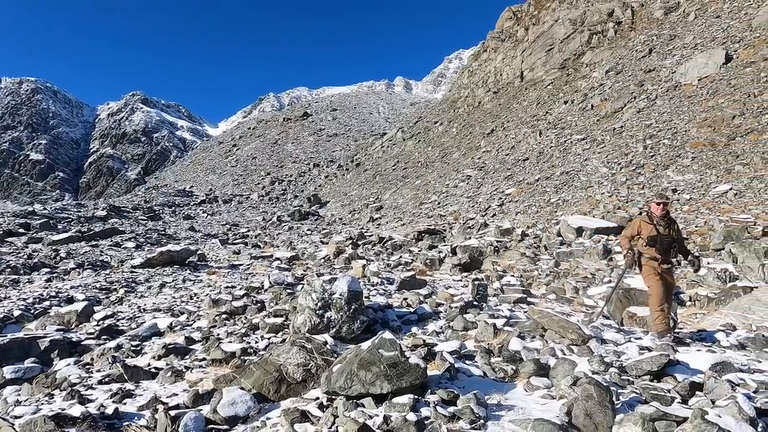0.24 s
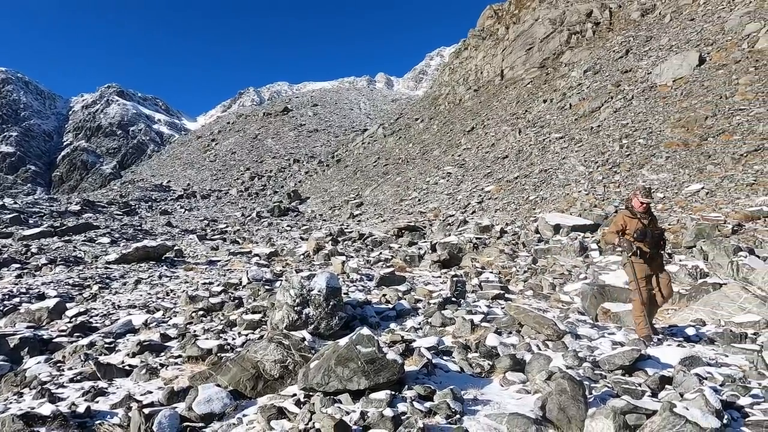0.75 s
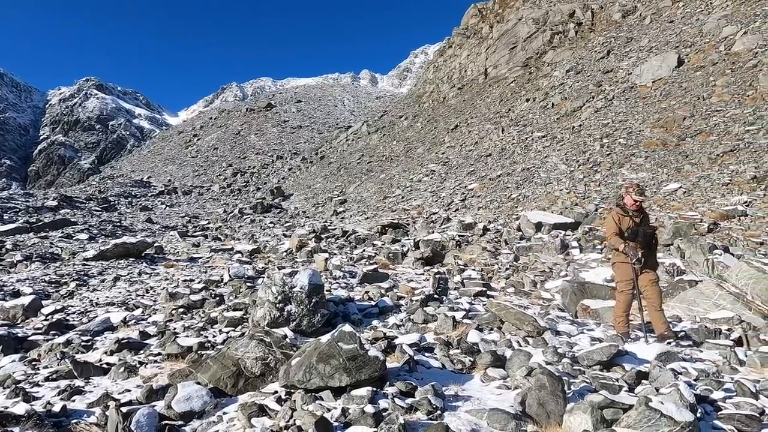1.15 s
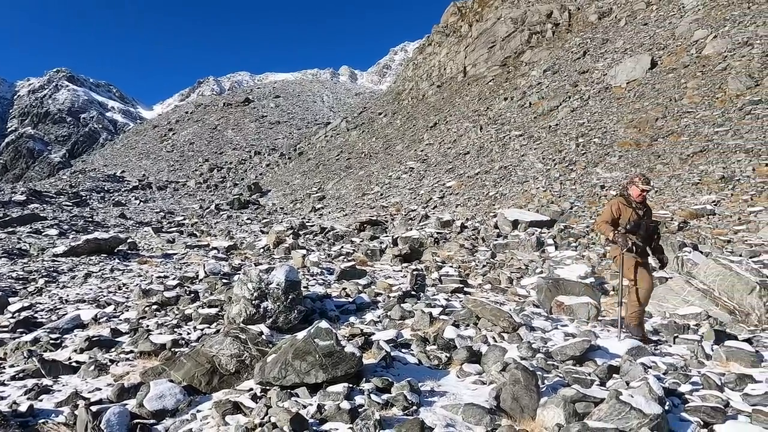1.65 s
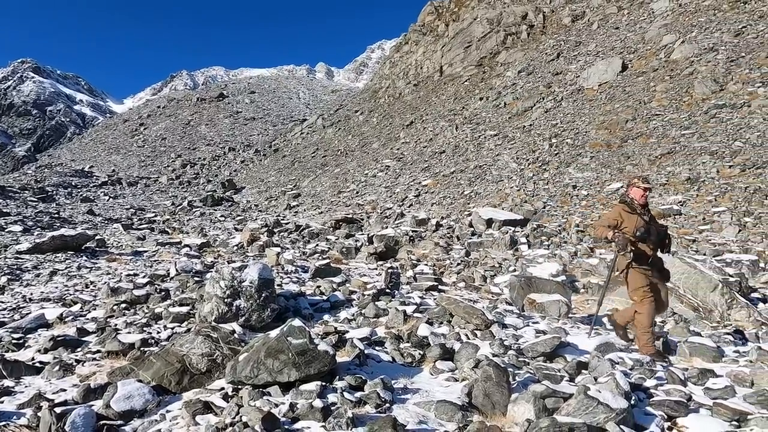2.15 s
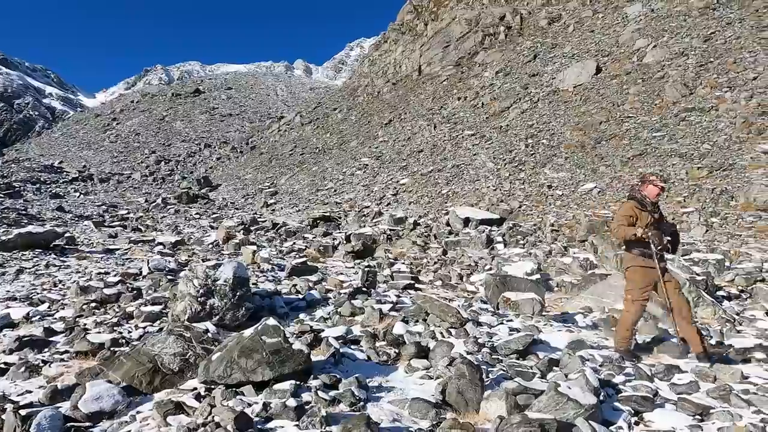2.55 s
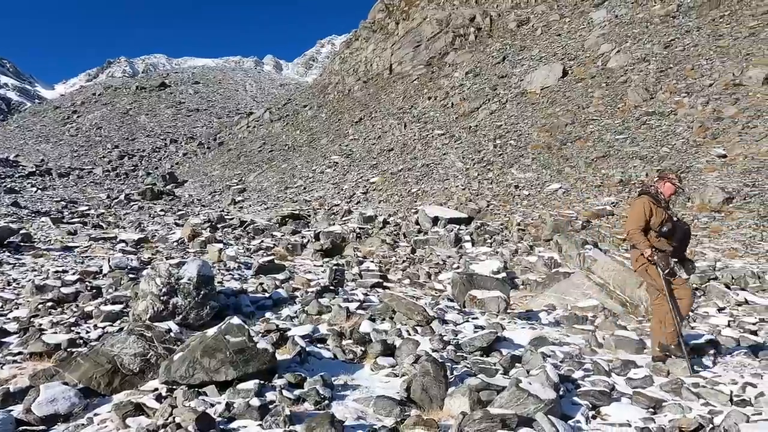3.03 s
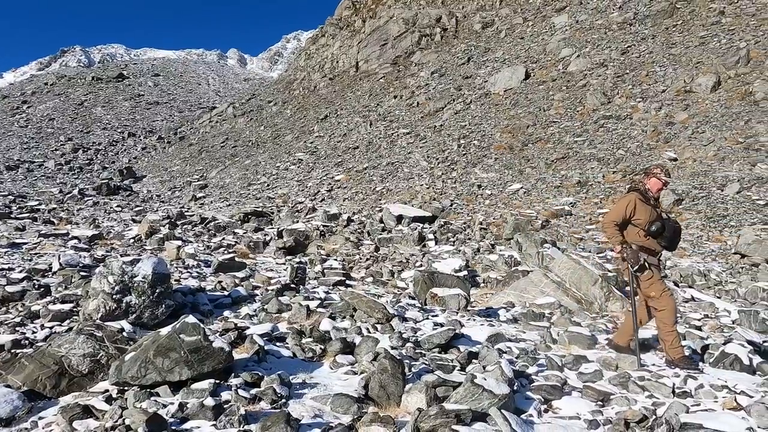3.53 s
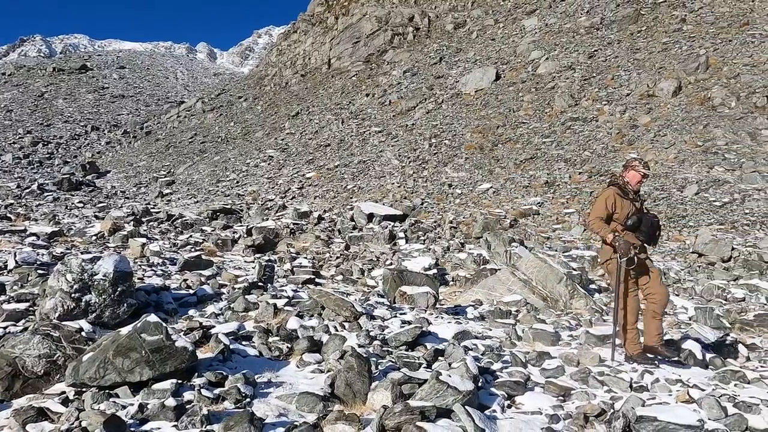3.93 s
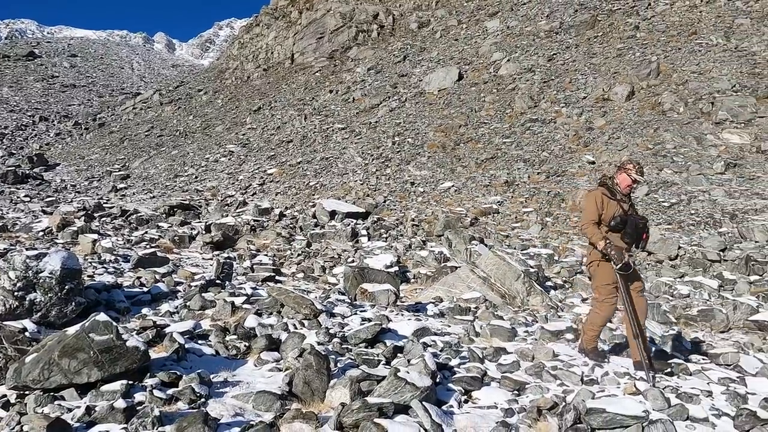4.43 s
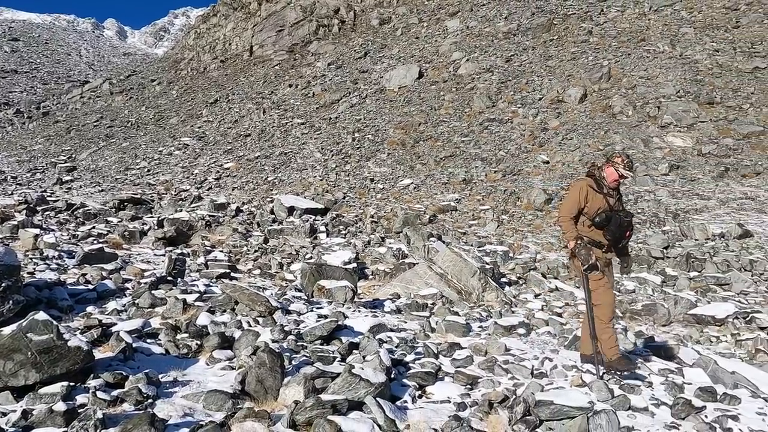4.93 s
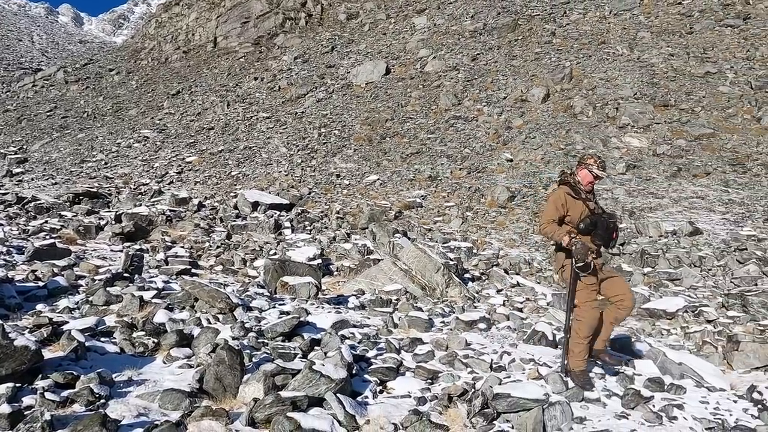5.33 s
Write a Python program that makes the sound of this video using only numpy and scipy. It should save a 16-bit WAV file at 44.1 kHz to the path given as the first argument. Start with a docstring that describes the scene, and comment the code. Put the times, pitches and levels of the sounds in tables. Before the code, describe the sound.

Sparse, dry rock clacks and short gritty scrapes from a walker on scree, with deep wind rumble strongest at the start.

```python
"""A walker with a pole crosses loose scree on an open mountainside, some metres from the microphone.
Stones tip under boots and pole, knock and grind: each contact is a crack of grit plus a few short modes,
and the rubble around scatters it as sparse echoes.
Wind buffets the microphone as shaped noise in three bands, over the smooth noise of a distant valley rush,
whose hiss eases slightly, then grows as the microphone turns towards it."""
import sys
import numpy as np
from scipy import signal
from scipy.fft import rfft, irfft
from scipy.io import wavfile
from scipy.ndimage import uniform_filter1d

SR = 44100
rng = np.random.default_rng(int(sys.argv[2]) if len(sys.argv) > 2 else 0)


def to_wav(s):
    """Save 16-bit WAV."""
    ch = np.atleast_2d(s).T  # columns
    pcm = np.round(np.clip(ch, -1, 1) * 32767)  # PCM
    wavfile.write(sys.argv[1], SR, pcm.astype(np.int16))


N = 246078

# strength of the wind at the microphone, about its mean: (t/s, large eddies level/dB, small eddies level/dB)
WIND_STRENGTH = [(0, 11, 2), (0.11, 13, 1), (0.4, 10.5, 3.5), (0.49, 4.2, -0.5), (0.78, 8.5, 7.5),
                 (0.93, 1.1, 1), (1.01, 6.5, 3), (1.55, -6.5, -6), (1.84, -12, -5), (2.01, 4, -5),
                 (2.23, -8.5, -6), (2.5, 3.5, 2), (2.9, 3.5, 2), (3.06, 0.5, 0.5), (3.25, -1, 5),
                 (3.52, -4.8, -3.1), (4.1, 6.5, 0), (4.26, -8, 1.5), (4.48, 9, 2), (4.74, -6.2, -1.0),
                 (5.58, -7.5, -0.5)]


def amp(db):
    """Amplitude factor of a level in dB."""
    return 10 ** (np.asarray(db) / 20)


def unit(x):
    """Scales to rms 1."""
    return x / np.sqrt(np.mean(x ** 2) + 1e-20)


def read(points, hz, roll_off_db=24):
    """A spectrum in dB, straight over log frequency; above its last point it falls by roll_off_db per octave."""
    f, db = np.transpose(points)
    octaves_above = np.log2(np.maximum(hz / f[-1], 1))
    level_db = np.interp(np.log(hz + 1e-3), np.log(f), db)
    return level_db - roll_off_db * octaves_above


def add(mix, s, sound):
    """Mixes a sound in at time s, cut where the mix ends."""
    part = mix[round(s * SR):][:len(sound)]
    part += sound[:len(part)]


def along(curve):
    """Each column of a curve, with a value for every sample."""
    s, *columns = np.transpose(curve)
    t = np.arange(N) / SR
    return [np.interp(t, s, column) for column in columns]


def noise(spectrum):
    """Steady noise of rms 1 with the given spectrum."""
    hz = np.fft.rfftfreq(N, 1 / SR)
    white = rfft(rng.standard_normal(N))
    return unit(irfft(white * amp(read(spectrum, hz)), N))


def blown(eddy_db, level_db, follow):
    """The gain of a layer that rises and falls with the wind."""
    return amp(level_db + follow * eddy_db)


def valley():
    """The smooth distant rush, barely stirred by the gusts, and the hiss heard when the microphone faces it."""
    # spectrum of the distant rush, relative: (f/Hz, level/dB per Hz)
    rush_spectrum = [(60, 2.5), (150, 0), (290, -2.5), (375, 2), (520, -0.5), (750, -2.5), (1200, -5.5),
                     (2200, -10.5), (3500, -15.5), (5500, -17), (8000, -23.5), (11500, -26), (15500, -35)]
    # spectrum of its hiss, relative: (f/Hz, level/dB per Hz)
    hiss_spectrum = [(600, 1.5), (2500, 3.5), (6500, -1), (9000, -4), (12000, -6.5), (15500, -18)]
    # the hiss as the microphone turns: (t/s, level/dB)
    facing = [(0, -68), (2.7, -70.5), (3.8, -64), (5.4, -58.5)]
    # how the rush follows the large eddies: (level in mean wind/dB, follow/dB per dB of wind)
    rush_law = (-53, 0.045)
    large_db, _ = along(WIND_STRENGTH)
    hiss_db, = along(facing)
    rush = blown(large_db, *rush_law) * noise(rush_spectrum)
    return rush + amp(hiss_db) * noise(hiss_spectrum)


def eddies(spectrum, size):
    """Turbulent pressure evened out over size samples, so that the gusts alone set its level."""
    x = noise(spectrum)
    return x / np.sqrt(uniform_filter1d(x ** 2, size) + 1e-3)


def wind():
    """Large eddies sway the diaphragm slowly and rumble; small ones flutter."""
    # spectra of the pressure on the microphone, relative: (f/Hz, level/dB per Hz)
    sway_spectrum = [(1, -14), (3, -5.5), (6, -0.5), (10, -3.5), (18, -21.5), (30, -39), (60, -82)]
    buffet_spectrum = [(10, -2.5), (20, -19), (30, -1), (42, -13.5), (60, -26.5), (90, -37.5), (140, -48),
                       (400, -85.5)]
    flutter_spectrum = [(30, -4), (55, 1), (80, 0), (120, -10), (180, -13), (300, -20), (800, -43),
                        (2000, -72)]
    # how each layer follows its eddies: (level in mean wind/dB, follow/dB per dB of wind)
    sway_law = (-23, 0.63)
    buffet_law = (-40, 0.99)
    flutter_law = (-57, 1.25)
    large_db, small_db = along(WIND_STRENGTH)
    sway = blown(large_db, *sway_law) * eddies(sway_spectrum, size=12000)
    rumble = blown(large_db, *buffet_law) * eddies(buffet_spectrum, size=4000)
    flutter = blown(small_db, *flutter_law) * eddies(flutter_spectrum, size=4000)
    return sway + rumble + flutter


def contact(tilt_db, size=1024):
    """The causal pulse of one contact, energy 1; harder points are brighter."""
    # spectrum of the crack, relative: (f/Hz, level/dB per Hz)
    crack_spectrum = [(120, -28), (350, -1), (800, -5.5), (1500, 2), (3800, -1.5), (5500, -4.5), (8400, -9),
                      (10000, -14), (15500, -25.5)]
    hz = abs(np.fft.fftfreq(size, 1 / SR))
    # the tilt nears tilt_db per octave well above 1 kHz
    gain_db = read(crack_spectrum, hz) + tilt_db * np.log2(1 + hz / 1000)
    # minimum phase puts the energy at the start
    log_response = np.conj(signal.hilbert(np.log(amp(gain_db))))
    pulse = np.fft.ifft(np.exp(log_response)).real
    return pulse / np.linalg.norm(pulse)


def ring(body, size=4096):
    """The short-lived modes of a struck body; neighbouring modes start in opposite directions."""
    # modes of the pole and of each stone: name: (f/Hz, relative level/dB, t60/s)
    bodies = { "pole": [(1310, 0.5, 0.02), (1620, 2, 0.034), (2000, -5, 0.0167), (2490, -1, 0.023),
              (3350, 0.5, 0.018), (5540, -2.5, .035), (8270, -5.5, 0.036), (13475, -17, .045)],
              "slab": [(973, -2, 0.031), (1362, 2, 0.0259), (2020, -5, 0.026), (2530, -4, 0.0147),
              (3460, -3, 0.012), (4150, -3.5, 0.012), (5810, -12, 0.016), (6900, -15, .012)],
              "plate": [(1550, 1, 0.031), (2200, -1, 0.023), (2640, 3.5, 0.0196), (3240, 2, 0.022),
              (3700, 3, .022), (3900, -3, 0.019), (5200, -1, 0.028), (5760, 1, 0.0183), (6460, -7, .018),
              (6970, -11, .025)], "flake": [(1532, -2, 0.0245), (2380, -2, .02), (3280, 2, .02),
              (3680, 1, 0.023), (4230, 3, 0.016), (4770, -1, 0.023), (5310, 3, .026), (8100, -4, .018),
              (8670, -9, 0.032)], "lump": [(1300, 3.5, 0.019), (1586, 0, 0.017), (2090, -1, 0.013),
              (2545, -0.5, 0.027), (3345, -6, 0.017), (4000, -6, 0.0177), (5200, -20.5, .014),
              (8936, -10, 0.026), (11514, -9, .012)], "shard": [(1700, -11, .02), (2508, -9, .018),
              (2880, 0, .028), (3500, -6, .022), (4000, -9, .014), (5800, -13, .014), (7700, -10, .022)],
              "cobble": [(421, -5, 0.027), (913, 1, 0.025), (1674, -3.5, 0.0197), (2580, -4, 0.021),
              (3413, 0.5, 0.031), (3870, -4, .018), (5246, -8, 0.027), (5640, -4.5, 0.018),
              (6300, -8, 0.016), (7930, -9, 0.0213), (8360, -10, 0.025)], "boulder": [(990, -8, 0.023),
              (1160, -3, 0.019), (1615, 1, .022), (1840, -0.5, 0.021), (2130, -0.5, 0.0147),
              (2680, -3, 0.0105), (3100, -10, 0.015), (3870, -3, .018), (6100, -6, 0.0159),
              (8100, -12, .016)], "ledge": [(1234, 1.5, 0.041), (1620, -1, 0.018), (2430, -8, .016),
              (3280, -4, 0.023), (5240, -10, 0.018), (7700, -3, 0.018), (8300, -3, .02), (8800, -4, 0.022)],
              "block": [(550, -5, .02), (748, -5, .022), (940, -5, .024), (1590, -2, .028),
              (2300, -7, .016), (3450, -5, .026), (3725, -1, .02), (3950, -6, .016), (5447, -10, .05),
              (5800, -8, .014), (6303, -8, .022), (7493, -9, .02), (9846, -14, .018)],
              "chip": [(1610, -2, .025), (3070, -4, .018), (3437, 2.5, .025), (3800, 4.5, .012),
              (4210, 3, .012), (5430, -1, 0.0254), (6680, -4, .018), (14300, -9, .012)], }
    t = np.arange(size) / SR
    modes = np.zeros(size)
    for k, (hz, db, t60) in enumerate(bodies[body]):
        modes += (-1) ** k * amp(db - 60 * t / t60) * np.sin(2 * np.pi * hz * t)
    return modes


def knock(body, ring_db, crack_db, tilt_db, t60, first_blow=1.6, grit_share=.3, size=4096):
    """One hard contact, a dying chatter of crushed grit, and the ring of the body."""
    fade = amp(-60 * np.arange(size) / SR / t60)
    grit = rng.standard_normal(size) * (rng.random(size) < grit_share)
    chatter = fade * unit(grit)
    chatter[0] = first_blow
    crack = signal.fftconvolve(chatter, contact(tilt_db))[:size]
    # the crack carries the energy of its fade, however bright it is
    crack *= np.linalg.norm(fade) / np.linalg.norm(crack)
    return amp(crack_db) * crack + amp(ring_db) * ring(body)


def rebounds(s, gap_s, count):
    """The first blow and each rebound, weaker and sooner each time, as (s, dB against the first)."""
    rebound_db, gap_share = -4, .88  # dB per rebound, share of the gap before
    k = np.arange(round(count) + 1)
    gaps = gap_s * gap_share ** k
    return zip(s + np.cumsum(gaps) - gaps, k * rebound_db)


def grind(start, end, body, from_db, to_db, tilt_db, slips_per_s=5000, ring_share=0.79):
    """Tiny irregular slips, each a small contact that keeps the sliding stone ringing."""
    count = max(round((end - start) * SR), 2)
    slips = rng.standard_normal(count) * (rng.random(count) < slips_per_s / SR)
    slips = unit(slips) * amp(np.linspace(from_db, to_db, count))
    modes = ring(body)
    one_slip = ring_share * modes / np.linalg.norm(modes)  # ring_share is against a contact of norm 1
    add(one_slip, 0, contact(tilt_db))
    return signal.fftconvolve(slips, one_slip / np.linalg.norm(one_slip))


def rubble(x, size=16384):
    """Sparse echoes off the rocks nearby, and a faint scatter from the slope; snow dulls both."""
    near_db, near_t60 = -11, 0.0646  # dB before dulling, s
    far_db, far_t60 = -26, 0.24  # dB before dulling, s
    echoes_per_s, dull_hz = 2500, 4000
    t = np.arange(size) / SR
    echoes = np.zeros(size)
    for db, t60 in ((near_db, near_t60), (far_db, far_t60)):
        signs = rng.choice([-1, 1], size)
        sparse = rng.random(size) < echoes_per_s / SR
        taps = signs * sparse * (t > .001) * amp(-60 * t / t60)
        echoes += amp(db) * taps / np.linalg.norm(taps)
    echoes = signal.lfilter(*signal.butter(1, dull_hz, fs=SR), echoes)
    return x + signal.fftconvolve(x, echoes)[:N]


def footsteps():
    """All knocks, rebounds and slides under the boots and the pole, scattered by the rubble."""
    # pole or stone on stone: (t/s, body, ring level/dB, crack level/dB, crack tilt/dB per octave,
    # crack t60/s, rebounds/count to be rounded, time to the first rebound/s)
    knocks = [ (1.2586, "slab", -23.5, -34.5, -1.8, .043, 0, 0), (1.2668, "pole", -38, -38, -1, .03, 0, 0),
              (1.2715, "pole", -37, -39.5, 2, .03, 0, 0), (1.3529, "plate", -35.5, -32.5, -.8, .027, 0, 0),
              (1.3728, "plate", -51, -47, 0, .02, 0, 0), (2.8915, "flake", -44, -39, -4, 0.0306, 0, 0),
              (2.8939, "flake", -42.5, -38, 0, .03, 1, .0041), (2.9223, "lump", -38.5, -44, -3, .025, 0, 0),
              (2.929, "lump", -38.5, -34, 1.8, 0.035, 3, .0078),
              (2.9775, "shard", -34.5, -36.5, 4, 0.015, 0, 0),
              (3.4090, "cobble", -33, -35.5, 0.3, 0.044, 0, 0), (3.7380, "chip", -62, -51.5, 8, .039, 0, 0),
              (4.0099, "chip", -44, -50, 15, .019, 0, 0),
              (4.5783, "boulder", -31, -33.5, -2, 0.018, 1, .0046),
              (4.58, "ledge", -36.5, -36, 2, .02, 0, 0),
              (4.5925, "pole", -41.5, -36, 2, 0.017, 1.5, 0.0089),
              (4.6276, "block", -29, -30.5, -1, 0.041, 0, 0), (4.7117, "shard", -41, -45, -0.5, .02, 0, 0),
              ]
    # a stone sliding under load: (start t/s, end t/s, body, start level/dB, end level/dB,
    # grit tilt/dB per octave)
    grinds = [ (1.273, 1.305, "plate", -47, -55, -0.5), (1.306, 1.35, "plate", -47.5, -44.5, -2.5),
              (1.363, 1.38, "plate", -49, -62, 3), (2.903, 2.926, "flake", -56, -52, -3),
              (2.938, 2.964, "lump", -37.5, -55, 3.5), (3.396, 3.412, "flake", -49, -47, 2.5),
              (3.422, 3.442, "cobble", -60, -57, 1), (4.583, 4.623, "ledge", -39.5, -51, 1),
              (4.638, 4.67, "block", -55, -57, -2), ]
    mix = np.zeros(N)
    for start, body, ring_db, crack_db, tilt_db, t60, count, gap_s in knocks:
        for s, drop_db in rebounds(start, gap_s, count=count):
            add(mix, s, knock(body, ring_db + drop_db, crack_db + drop_db, tilt_db, t60))
    for row in grinds:
        add(mix, row[0], grind(*row))
    return rubble(mix)


def scene():
    """Valley, wind and footsteps at one microphone."""
    return (valley() + wind() + footsteps())[None]


def record(dry):
    """Low-pass: nothing is heard above about 15.8 kHz."""
    edge_hz = 15800
    low_pass = signal.firwin(511, edge_hz, window=("kaiser", 9), fs=SR)
    padded = np.pad(dry, ((0, 0), (len(low_pass) // 2,) * 2), mode="edge")
    return signal.oaconvolve(padded, low_pass[None], "valid")


dry = scene()
out = record(dry)
to_wav(out)
```